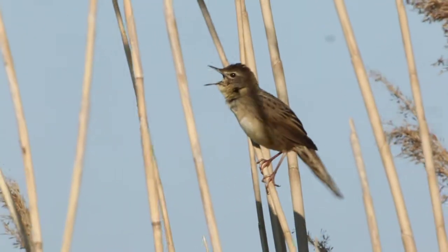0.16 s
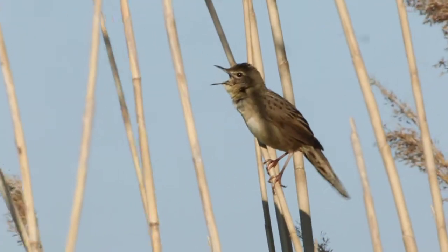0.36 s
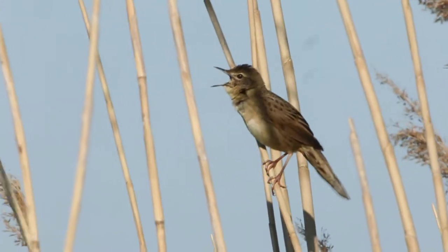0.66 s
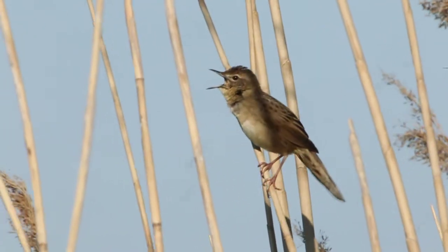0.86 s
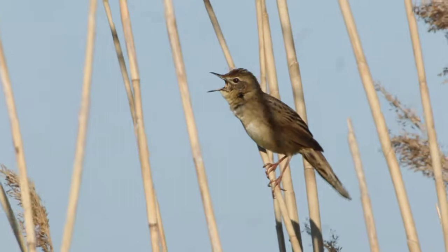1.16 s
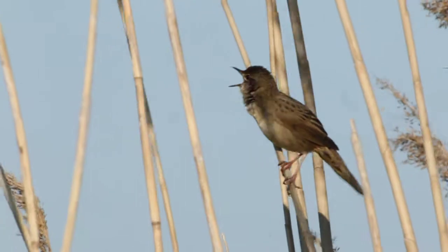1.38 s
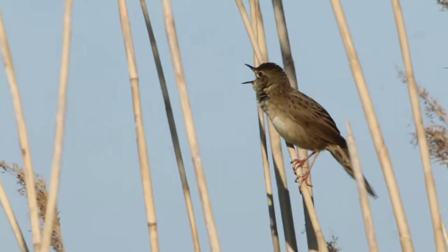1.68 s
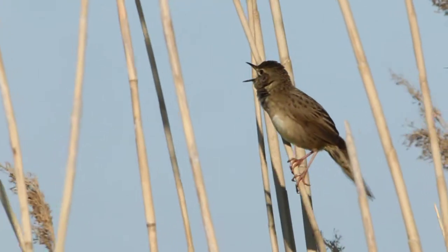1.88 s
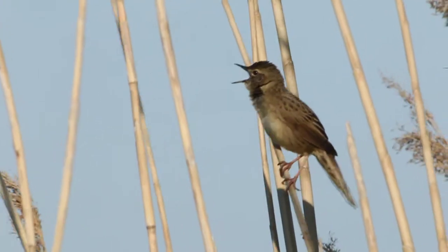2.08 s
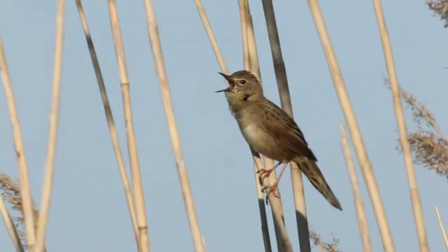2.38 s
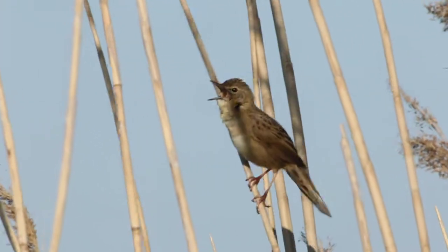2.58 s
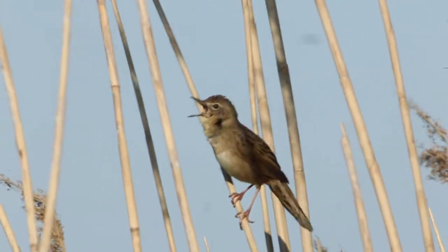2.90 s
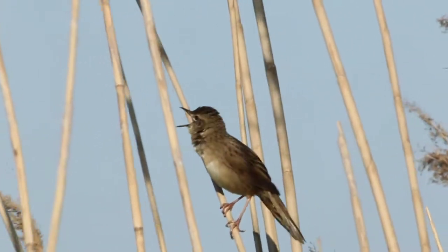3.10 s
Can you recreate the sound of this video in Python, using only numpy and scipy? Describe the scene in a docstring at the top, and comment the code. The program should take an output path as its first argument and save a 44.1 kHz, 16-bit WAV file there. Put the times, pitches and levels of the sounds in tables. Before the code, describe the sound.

A small bird's fast, dry, insect-like reeling trill runs on without pause over faint distant chirps

```python
"""At a reed bed, a grasshopper warbler reels from a swaying reed, about 25 pairs a second, stumbling once half way.
Each pair is a swept sine, the sharp upward tick, then a usually louder note that scoops up and falls.
Delayed copies and decaying noise tails make the echoes of stems and field.
Far birds are gliding, pulsed or sinking sines, most with echo; filtered noise makes the faint outdoor hush."""
import sys
import numpy as np
from scipy import signal
from scipy.fft import rfft, irfft
from scipy.io import wavfile
from scipy.ndimage import uniform_filter1d, map_coordinates

SR = 44100
rng = np.random.default_rng(int(sys.argv[2]) if len(sys.argv) > 2 else 0)


def materialize(psi):
    """Save the field psi as 16-bit PCM at rate SR to the path in sys.argv[1].

    A 1-D psi becomes a single channel; in a 2-D psi each row is a channel.
    """
    bounded = np.clip(np.atleast_2d(psi).T, -1, 1)
    quanta = np.round(bounded * 32767).astype(np.int16)
    wavfile.write(sys.argv[1], SR, quanta)


N = 143325  # length in samples


def undb(db):
    """Level to amplitude: 20 dB is a factor of ten."""
    return 10 ** (np.asarray(db) / 20)


def add(out, start, sound):
    """Superposition: mix a sound in at its start time in s."""
    i = int(round(start * SR))
    a, b = max(i, 0), min(i + len(sound), N)
    if b > a:
        out[a:b] += sound[a - i:b - i]


def turn(hz):
    """Phase is the running integral of frequency."""
    return 2 * np.pi * np.cumsum(hz) / SR


def walk(rate):
    """Low-pass randomness: held random steps, smoothed twice, wander with a spread near 1."""
    k = int(SR / rate)
    steps = np.repeat(rng.standard_normal(64), k)[:N]
    return uniform_filter1d(uniform_filter1d(steps, k), k)


def waver(rate, size):
    """Interpolated randomness: a quick wobble for one short sound, spread near 1."""
    return np.interp(np.arange(size) * rate / SR, np.arange(64), rng.standard_normal(64))


def shape(points):
    """Frequency response: gain interpolated in dB over log frequency from (f/Hz, level/dB) points."""
    hz, points = np.maximum(np.fft.rfftfreq(N, 1 / SR), 1), np.array(points)
    return undb(np.interp(np.log(hz), np.log(points[:, 0]), points[:, 1]))


def scatter(x, t60):
    """Diffuse reverberation: convolution with decaying noise of unit energy."""
    t = np.arange(SR // 2) / SR
    decay = np.exp(-np.log(1000) * t / t60)  # 60 dB down at t60
    tail = rng.standard_normal(len(t)) * decay * np.minimum(t / 0.0074, 1)
    return signal.fftconvolve(x, tail / np.linalg.norm(tail))[:N]


# spectral density of the outdoor hush: f/Hz, relative level/dB per Hz
HUSH_SPECTRUM = [(20, -35), (35, -5), (55, -4), (140, 1), (260, -3), (420, -8.5), (900, -8), (2000, -9),
                 (3000, -9.5), (5000, -6), (8000, -12), (11000, -12.5), (13500, -18), (16000, -29)]
# slow course of the rumble against the hiss: t/s, relative level/dB
RUMBLE_COURSE = [(0, -2), (.6, 2.5), (1.4, 3), (2.1, -1.5), (3.25, -0.5)]
HUSH_DB, RUMBLE_HZ, RUMBLE_SWELL_DB = -59, 250, -0.75  # rms of the whole; crossover; random swell


def hush():
    """Filtered noise: steady outdoor hiss over a low rumble whose amplitude swells and eases."""
    spectrum = rfft(rng.standard_normal(N)) * shape(HUSH_SPECTRUM)
    low = 1 / (1 + (np.fft.rfftfreq(N, 1 / SR) / RUMBLE_HZ) ** 2)
    swell_db = np.interp(np.arange(N) / SR, *np.array(RUMBLE_COURSE).T) + RUMBLE_SWELL_DB * walk(9.1)
    hiss = irfft(spectrum * (1 - low), N)
    rumble = irfft(spectrum * low, N) * undb(swell_db)
    air = hiss + rumble
    return undb(HUSH_DB) * air / air.std()


CLICK_HZ, CLICK_WIDTH_S = 3210, 0.00026


def click():
    """Gaussian wave packet: a dull click of a few cycles at random phase."""
    t = np.arange(-64, 65) / SR
    packet = np.exp(-.5 * (t / CLICK_WIDTH_S) ** 2)
    return packet * np.sin(2 * np.pi * CLICK_HZ * t + rng.uniform(0, 2 * np.pi))


def voice(hz, octave_db, rasp_db):
    """Harmonic spectrum: a nearly pure tone with a weak octave and a trace of noise as rasp."""
    phase = turn(hz) + rng.uniform(0, 2 * np.pi)
    octave = undb(octave_db) * np.sin(2 * phase)
    rasp = undb(rasp_db) * rng.standard_normal(len(hz))
    return np.sin(phase) + octave + rasp


TICK_WIDTH_S, TICK_HZ, TICK_SWEEP_HZ, TICK_SWEEP_S = 0.00034, 6048, 1540, 0.000812
TICK_OCTAVE_DB, TICK_RASP_DB = -27.5, -23
# a rough, high squeak that trails each tick; its level is relative to the tick
SQUEAK_HZ, SQUEAK_DB, SQUEAK_RISE_S, SQUEAK_WAVER_HZ, SQUEAK_WAVERS_PER_S = 6512, -19, 0.0022, 303, 1180


def tick(stretch):
    """Frequency sweep: a brief upward chirp trailing off in a squeak; returns its lead time and the sound."""
    t = np.arange(-64, SR // 90) / SR  # 0 at the peak
    rise = 1 - np.exp(-t / (TICK_SWEEP_S * stretch))
    sweep_hz = np.maximum(TICK_HZ + TICK_SWEEP_HZ * rise, 2500)
    packet = np.exp(-.5 * (t / (TICK_WIDTH_S * stretch)) ** 2)
    sweep = packet * voice(sweep_hz, TICK_OCTAVE_DB, TICK_RASP_DB)
    age = np.maximum(t, 0) / SQUEAK_RISE_S
    squeak_hz = SQUEAK_HZ + SQUEAK_WAVER_HZ * waver(SQUEAK_WAVERS_PER_S, size=len(t))
    squeak = age * np.exp(1 - age) * voice(squeak_hz, TICK_OCTAVE_DB, TICK_RASP_DB)
    return -t[0], sweep + undb(SQUEAK_DB) * squeak


NOTE_TOP_HZ, NOTE_TOP_S, NOTE_SCOOP_HZ, NOTE_SCOOP_S = 66.6, 0.0018, 402, 0.00051  # top is above the pitch
NOTE_MOST_SAG_HZ, NOTE_GLIDE_HZ_PER_S = 500, 98000
NOTE_ATTACK_S, NOTE_CREST_S, NOTE_FALL_S, NOTE_RASP_DB = 0.00073, .002, 0.0025, -48
FLICK_S, FLICK_WIDTH_S = 0.0062, 0.0012  # a small second swell that ends each note


def note(pitch_hz, octave_db, stretch, flick_db):
    """Frequency and amplitude modulation: a whistle scoops up, crests, sags as it fades and ends in a flick."""
    t = np.arange(SR // 80) / SR
    scoop_hz = NOTE_SCOOP_HZ * np.exp(-t / NOTE_SCOOP_S)
    sag_hz = np.clip(NOTE_GLIDE_HZ_PER_S * (t - NOTE_TOP_S * stretch), 0, NOTE_MOST_SAG_HZ)
    hz = pitch_hz + NOTE_TOP_HZ - scoop_hz - sag_hz
    attack = np.sin(np.pi / 2 * np.minimum(t / NOTE_ATTACK_S, 1)) ** 2
    crest = np.exp(-((t - NOTE_CREST_S * stretch) / (NOTE_FALL_S * stretch)) ** 2)
    flick = undb(flick_db) * np.exp(-((t - FLICK_S * stretch) / FLICK_WIDTH_S) ** 2)
    return attack * (crest + flick) * voice(hz, octave_db, NOTE_RASP_DB)


# rhythm, steady between rows: pair number, tick t/s
PAIR_TIMES = [(-1, -.0035), (19, .789), (23, .9507), (37, 1.5093), (41, 1.6705), (42, 1.6872), (49, 1.9659),
              (60, 2.4074), (69, 2.7659), (74, 2.9672), (81, 3.2467)]
# strength as the head turns to and fro, ahead of the bill's colour, and pitch:
# t/s, note level/dB, tick level/dB, note f/Hz
HEAD_TURNS = [(0, -20, -21.5, 5940), (.22, -22, -23.5, 6024), (.53, -18, -20, 5957), (.76, -22, -22, 6023),
              (.95, -27, -25, 6040), (1.15, -22, -23.5, 5900), (1.38, -32, -28.5, 5920),
              (1.46, -25, -25.5, 5860), (1.64, -35.5, -31, 5890), (1.71, -30, -27, 5830),
              (1.79, -31, -25.5, 5840), (1.95, -23, -24, 5896), (2.13, -19, -21, 5940),
              (2.28, -15.5, -18.5, 6020), (2.62, -19.5, -21.5, 6013), (2.91, -17, -21, 6010),
              (3.23, -22, -24, 5983)]
# colour of throat and bill: f/Hz, level/dB
BILL_COLOUR = [(1000, -25), (3000, -2.5), (6000, 0.5), (7200, 1), (7900, -1), (9300, 6), (11000, -7.5),
               (11900, -1.5), (12600, -10), (13200, 2.5), (14500, -13)]
NOTE_LAG_S, CLICK_LEAD_S, CLICK_DB = .0126, .0047, -24.5  # after, before and relative to the tick
# the note's octave, and the share of the note's swings in level that it does not follow
NOTE_OCTAVE_DB, OCTAVE_HOLD, USUAL_NOTE_DB = -30, 0.6, -17.5
# no two pairs are alike: spread of timing, strength, pitch, length (share), flick and click
JITTER_S, SCATTER_DB, SCATTER_HZ, SCATTER_LENGTH = 0.00016, 0.7, 32, .08
FLICK_DB, FLICK_SCATTER_DB, CLICK_SCATTER_DB = -7, 2.2, 3


def warbler():
    """Source and filter: click, tick and note in turn, coloured by the bill; a too early tick drops a note."""
    out, beat, effort = np.zeros(N), np.array(PAIR_TIMES), np.array(HEAD_TURNS)
    times = np.interp(np.arange(beat[0, 0], beat[-1, 0] + 1), *beat.T)
    rooms = np.diff(times, append=np.inf)  # time until the next tick
    for at, room, luck in zip(times, rooms, rng.standard_normal((len(times), 9))):
        note_db, tick_db, hz = (np.interp(at, effort[:, 0], col) for col in effort.T[1:])
        lead, sound = tick(np.exp(SCATTER_LENGTH * luck[6]))
        add(out, at - lead + JITTER_S * luck[0], undb(tick_db + SCATTER_DB * luck[1]) * sound)
        click_db = tick_db + CLICK_DB + CLICK_SCATTER_DB * luck[5]
        add(out, at - lead - CLICK_LEAD_S, undb(click_db) * click())
        if room > 2 * NOTE_LAG_S:
            octave_db = NOTE_OCTAVE_DB + OCTAVE_HOLD * (USUAL_NOTE_DB - note_db)
            stretch, flick_db = np.exp(SCATTER_LENGTH * luck[7]), FLICK_DB + FLICK_SCATTER_DB * luck[8]
            sound = note(hz + SCATTER_HZ * luck[4], octave_db, stretch, flick_db)
            add(out, at + NOTE_LAG_S + JITTER_S * luck[2], undb(note_db + SCATTER_DB * luck[3]) * sound)
    return irfft(rfft(out) * shape(BILL_COLOUR), N)


# nearby stems that mirror the song: delay t/s, level/dB
STEM_ECHOES = [(.0019, -14.5), (.0048, -22), (.0158, -20.5)]
# colour of what the reeds send back: f/Hz, level/dB
REED_COLOUR = [(5200, -1.5), (5900, 1.5), (6600, 3), (7400, 2), (12000, -2)]
SWAY_S, SWAYS_PER_S = 0.00017, 2.035  # wander of the stem delays
REEDS_DB, REEDS_T60_S, FIELD_DB, FIELD_T60_S = -15.5, 0.089, -18, 0.54
WASH_HOLD = 0.71  # share of the swings in level, from the head turning, that the reed bed does not follow


def reeds(song):
    """Reflection and scattering: swaying stem echoes and tails that hold up when the bird turns away."""
    note_db = np.interp(np.arange(N) / SR, *np.array(HEAD_TURNS).T[:2])
    all_round = song * undb(WASH_HOLD * (USUAL_NOTE_DB - note_db))
    all_round = irfft(rfft(all_round) * shape(REED_COLOUR), N)
    out = song + undb(FIELD_DB) * scatter(all_round, FIELD_T60_S)
    for delay, db in STEM_ECHOES:
        path_s = delay + SWAY_S * walk(SWAYS_PER_S)
        out = out + undb(db) * map_coordinates(all_round, [np.arange(N) - path_s * SR], order=3)
    # four independent tails fade into each other, so the scatter shifts
    for share in np.sin(np.pi * (np.arange(N) / N + np.arange(4)[:, None] / 4)):
        out = out + undb(REEDS_DB) * share * scatter(all_round, REEDS_T60_S) / np.sqrt(2)
    return out


# level of a call that is as weak as its own echo; decay of that echo
FAR_ALL_ECHO_DB, FAR_T60_S = -69.5, 0.17


def distant(call, db):
    """Direct-to-reverberant ratio: the echo's level falls only half as fast in dB as the call's."""
    echo = undb((db + FAR_ALL_ECHO_DB) / 2) * scatter(call, FAR_T60_S)
    return echo + undb(db) * np.pad(call, (0, len(echo) - len(call)))


WAVER_HZ, WAVER_DB, WAVERS_PER_S = 35, 1, 168  # spread in pitch and level


def whistle(length, start_hz, mid_hz, end_hz):
    """Frequency glide: a sine on a parabola through three pitches, wavering in pitch and level."""
    u = np.linspace(0, 1, int(length * SR))
    glide_hz = np.polyval(np.polyfit([0, .5, 1], [start_hz, mid_hz, end_hz], 2), u)
    hz = glide_hz + WAVER_HZ * waver(WAVERS_PER_S, size=len(u))
    level = undb(WAVER_DB * waver(WAVERS_PER_S, size=len(u)))
    return signal.windows.tukey(len(u), .5) * level * np.sin(turn(hz))


# distant whistles: t/s, length t/s, start f/Hz, middle f/Hz, end f/Hz, level/dB
FAR_WHISTLES = [(0, 0.021, 3300, 2870, 2550, -53.5), (0.169, 0.033, 3430, 2900, 2420, -55),
                (.465, 0.032, 3510, 2970, 2560, -64), (0.514, 0.034, 2270, 2870, 3180, -64),
                (0.73, 0.078, 2760, 2990, 3180, -66), (0.772, 0.039, 2850, 2430, 2180, -62.5),
                (1.33, 0.013, 4110, 4800, 4880, -41), (1.334, 0.034, 4970, 4700, 4440, -36),
                (1.446, 0.024, 3570, 3320, 2950, -55.5), (1.547, 0.093, 3150, 3450, 3650, -58.5),
                (1.637, 0.03, 3600, 4040, 4330, -57), (1.64, 0.031, 3200, 2840, 2650, -60.5),
                (1.74, 0.061, 3110, 3430, 3690, -57.5), (1.785, .032, 3700, 3410, 2830, -53),
                (2.06, 0.041, 2850, 3000, 3030, -67), (1.89, 0.072, 3085, 3400, 2970, -58),
                (2.261, 0.0303, 5560, 5100, 5050, -43.5), (2.288, 0.034, 3490, 3500, 3520, -53.5),
                (2.348, 0.037, 3440, 3450, 3440, -57), (2.328, 0.033, 4950, 5000, 5100, -49),
                (2.731, 0.076, 3410, 3460, 3330, -62), (2.81, 0.038, 2800, 2800, 2740, -63.5),
                (2.943, 0.043, 3060, 2900, 2870, -65), (3.188, 0.054, 3050, 2880, 2850, -60),
                (3.19, 0.073, 1376, 1404, 1430, -66.5)]


def far_whistles():
    """Reverberant blurring: gliding whistles, each mixed with its own echo."""
    out = np.zeros(N)
    for at, *glide, db in FAR_WHISTLES:
        add(out, at, distant(whistle(*glide), db))
    return out


CHATTER_HZ, CHATTER_SPREAD_HZ, CHATTER_GLIDE_HZ = 2997, 420, 221
CHATTER_NOTE_S, CHATTER_DB, CHATTER_T60_S = 0.0392, -68, 0.23


def chatter(count=22):
    """Random superposition: faint notes of still farther birds at random times and pitches, with echo."""
    out = np.zeros(N)
    for at, (pitch, glide) in zip(rng.uniform(0, N / SR, count), rng.standard_normal((count, 2))):
        hz, glide_hz = CHATTER_HZ + CHATTER_SPREAD_HZ * pitch, CHATTER_GLIDE_HZ * glide
        add(out, at, whistle(CHATTER_NOTE_S, hz - glide_hz, hz, hz + glide_hz))
    return undb(CHATTER_DB) * (out + scatter(out, CHATTER_T60_S))


PIPE_S, PIPE_HZ, PIPE_SAG_HZ_PER_S, PIPE_RISE_S, PIPE_DB = .385, 1250, 440, 0.041, -60.5


def far_pipe():
    """Exponential decay: one far, low whistle swells quickly, sinks in pitch and fades more slowly."""
    t = np.maximum(np.arange(N) / SR - PIPE_S, 0)
    swell = t / PIPE_RISE_S * np.exp(1 - t / PIPE_RISE_S)
    return undb(PIPE_DB) * swell * np.sin(turn(PIPE_HZ - PIPE_SAG_HZ_PER_S * t))


# distant trills: t/s, length t/s, start f/Hz, end f/Hz, fall within each pulse f/Hz (half the full swing),
# mean pulse rate f/Hz, level/dB, fade level/dB
FAR_TRILLS = [(1.3565, 0.065, 4575, 4500, -170, 135, -37.5, 9),
              (1.853, 0.053, 4740, 4400, 63, 112, -46, -1.5), (1.909, 0.015, 3890, 3400, 98, 200, -48.5, 4),
              (2.387, 0.044, 5130, 4850, 90, 115, -49, 2), (0.799, 0.1, 2340, 2230, 83, 28, -70, 0),
              (1.802, 0.13, 2280, 2100, 140, 27, -62, 7), (2.718, 0.11, 2320, 2230, 94, 27.5, -66.5, 2)]
TRILL_THROB, TRILL_UNEVEN = 0.62, 0.086  # depth of the throb; spread of the pulse rate (shares)


def far_trills():
    """Joint amplitude and frequency modulation: one uneven beat throbs the level and bends the pitch."""
    out = np.zeros(N)
    for at, length, start_hz, end_hz, depth_hz, rate, db, fade_db in FAR_TRILLS:
        t = np.arange(int(length * SR)) / SR
        beat = turn(rate * (1 + TRILL_UNEVEN * waver(rate, size=len(t))))
        hz = np.linspace(start_hz, end_hz, len(t)) - depth_hz * np.sin(beat)
        fade = undb(-fade_db * t / length) * signal.windows.tukey(len(t), .3)
        throb = 1 + TRILL_THROB * np.cos(beat)
        add(out, at, distant(fade * throb * np.sin(turn(hz)), db))
    return out


def scene():
    """Linear superposition of the song with its echoes, the far birds and the hush."""
    far_birds = far_whistles() + chatter() + far_pipe() + far_trills()
    return (hush() + reeds(warbler()) + far_birds)[None]


TOP_HZ = 15900


def record(dry):
    """Band limitation: the recorder cuts the top with a steep elliptic low-pass."""
    return signal.sosfilt(signal.ellip(8, .2, 70, TOP_HZ, fs=SR, output="sos"), dry)


dry = scene()
out = record(dry)
materialize(out)
```